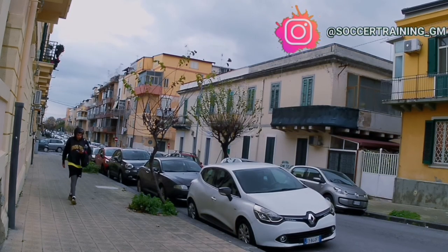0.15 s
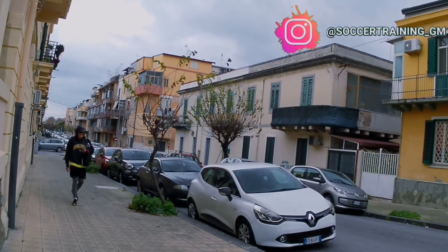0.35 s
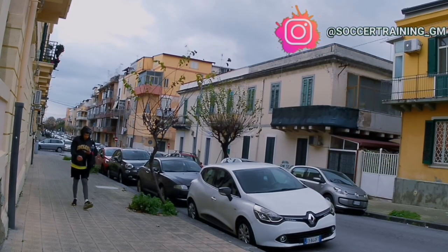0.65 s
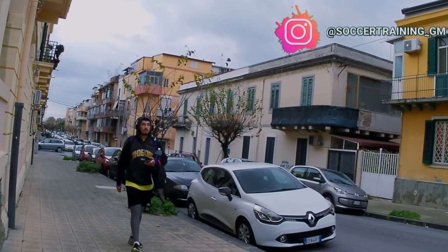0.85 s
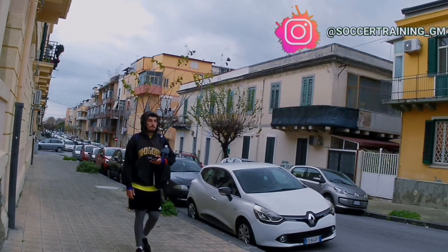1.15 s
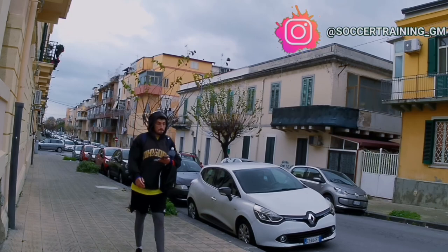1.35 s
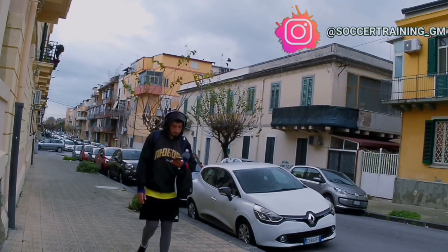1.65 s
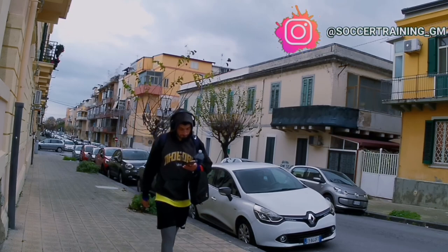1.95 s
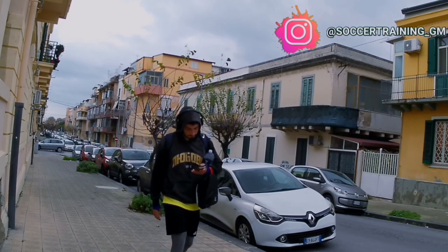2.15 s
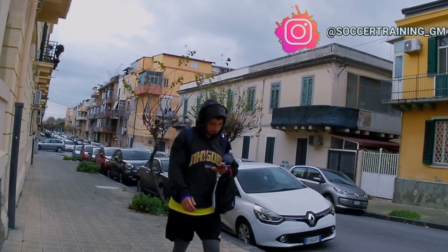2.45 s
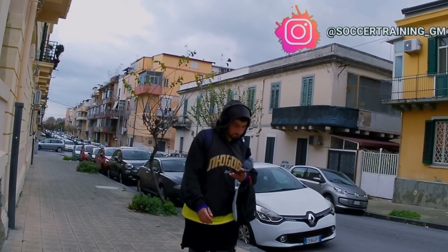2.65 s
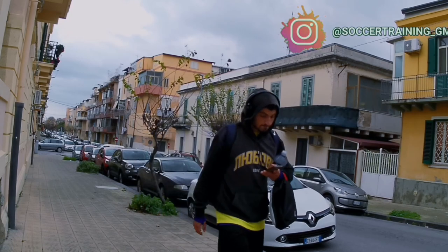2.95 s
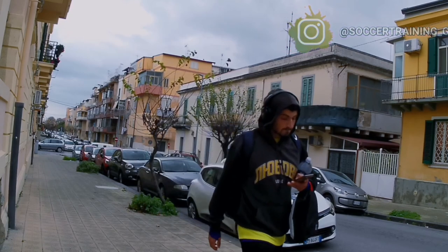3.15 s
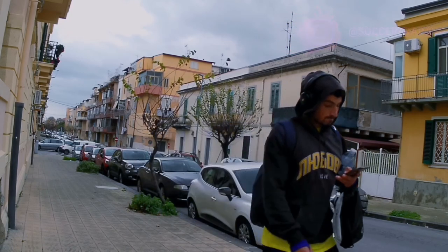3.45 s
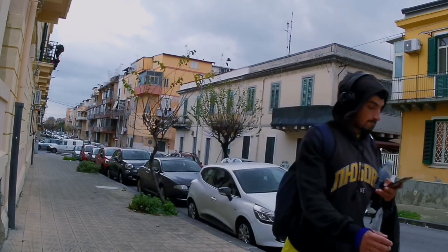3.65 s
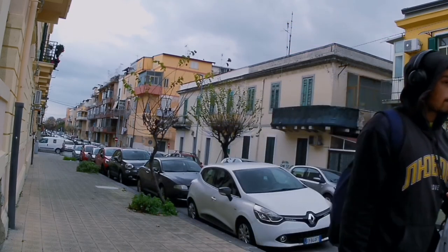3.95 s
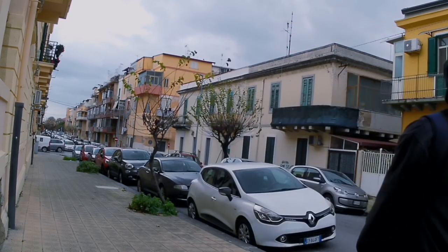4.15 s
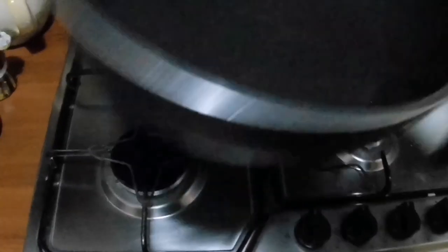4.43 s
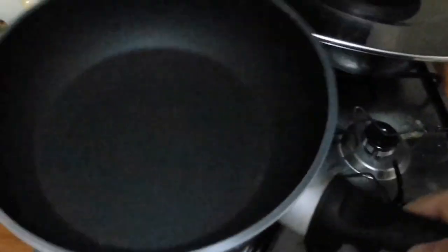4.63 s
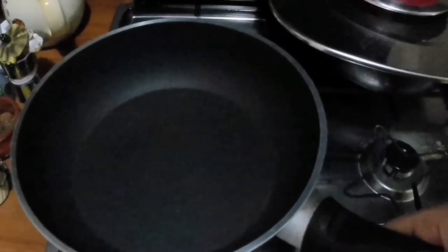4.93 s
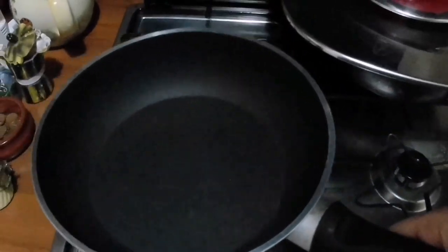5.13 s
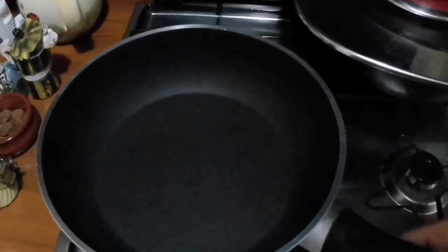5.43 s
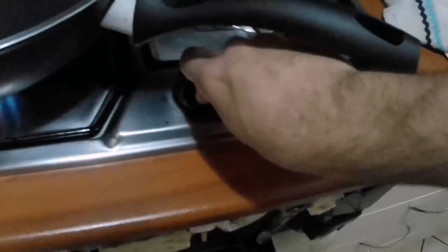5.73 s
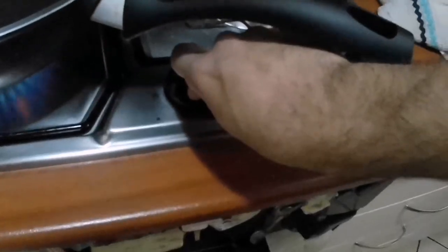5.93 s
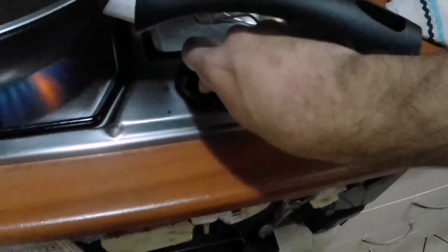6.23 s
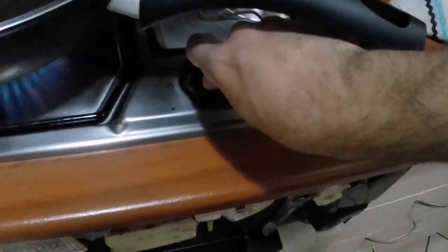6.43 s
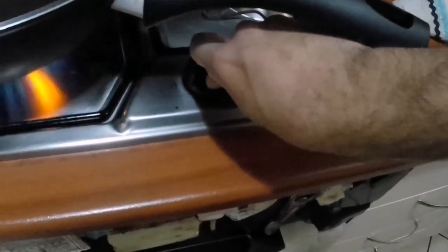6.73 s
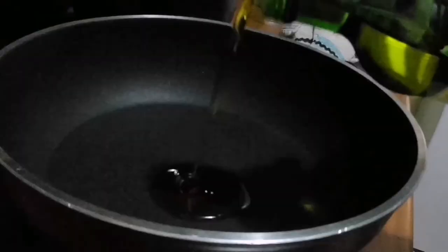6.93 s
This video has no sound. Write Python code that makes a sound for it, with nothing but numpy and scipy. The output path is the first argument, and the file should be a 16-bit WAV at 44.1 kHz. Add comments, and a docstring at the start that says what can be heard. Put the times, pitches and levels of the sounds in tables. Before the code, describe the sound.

Single-channel handheld sound with soft ticks at abrupt cuts. First, muffled road noise and engine drone outdoors, then a quieter street with deep rumble and a slow motor. Next, a nearly silent kitchen with faint whirs, broken by a loud, close pan landing on a gas hob, bouncing and scraping briefly. Finally, evenly spaced crisp spark cracks, a fluttering burner ignition, low flame and gas hiss.

```python
"""Quiet town street, in two passages, then a small kitchen, in three; all joined by quick cuts.
Street: coloured-noise traffic, engines as harmonics of a firing rate, soles scuffing the pavement.
Kitchen: a pan lands on the steel grate of a gas hob (noise blows, ringing modes) and rattles to rest.
The igniter snaps four times (noise cracks that ring the steel); the first spark lights the burner with
a soft whoosh, and the flame hisses on (low roar, gas noise in the burner tube's resonances)."""
import sys
import numpy as np
from scipy import signal
from scipy.fft import rfft, irfft, next_fast_len
from scipy.io import wavfile
from scipy.ndimage import map_coordinates

SR = 44100
rng = np.random.default_rng(int(sys.argv[2]) if len(sys.argv) > 2 else 0)


def pcm_store(signal):
    """Save signal as 16-bit PCM."""
    levels = np.round(np.clip(np.atleast_2d(signal), -1, 1) * 32767)
    wavfile.write(sys.argv[1], SR, levels.astype(np.int16).T)


N = 312448

# Passages: (start [s], end [s], fade-in [s], fade-out [s])
BUSY_SPAN = (-.1, .778, .01, .002)
CALM_SPAN = (.8, 4.286, .01, .001)
PAN_SPAN = (4.351, 5.723, .00005, .00005)
FLAME_SPAN = (5.728, 6.977, .018, .00006)
LAST_SPAN = (6.988, 7.2, .012, .002)
SPANS = (BUSY_SPAN, CALM_SPAN, PAN_SPAN, FLAME_SPAN, LAST_SPAN)

# Noise spectra of street traffic and low rumble: (frequency [Hz], relative density [dB])
BUSY_SPECTRUM = [(25, -4.5), (85, -7), (115, -10.5), (232, -12.5), (390, -20), (900, -20), (1190, -17.5),
                 (1480, -28.5), (2000, -25), (3300, -47), (3950, -49.5), (4700, -41.5), (6000, -59),
                 (11000, -81)]
CALM_SPECTRUM = [(65, -15), (110, -1.5), (178, -9), (198, -4), (371, -11), (611, -8), (1000, -15),
                 (1140, -12.5), (1400, -19), (1810, -16), (2600, -26.5), (3270, -38), (4810, -40),
                 (6340, -50.5), (9000, -67), (11700, -73), (19800, -120)]
RUMBLE_SPECTRUM = [(11, -38), (18, -7), (27, 7), (43, 1), (64, -2), (91, -2.5), (113, -26.5), (130, -12),
                   (170, -64), (290, -120)]
# Noise spectra of flame roar, ignition whoosh and kitchen air: (frequency [Hz], relative density [dB])
ROAR_SPECTRUM = [(30, -14), (80, 1), (135, -6), (175, -14), (260, -7.5), (400, -18.5), (550, -19.5),
                 (900, -25.5), (2500, -76)]
WHOOSH_SPECTRUM = [(130, -39), (220, -3), (312, -33), (348, 10), (453, -4), (582, 5.5), (1110, -1),
                   (1600, -10), (3000, -24.5), (3900, -63), (6600, -120)]
ROOM_SPECTRUM = [(20, -10.5), (45, -15), (80, -24), (170, -41), (270, -34), (400, -39), (650, -42.5),
                 (1000, -44), (1400, -47.5), (1900, -48), (3000, -55.5), (15000, -64.5)]
# Noise spectra of the pan's blow, the hollow hob and the spark: (frequency [Hz], relative density [dB])
CLANK_SPECTRUM = [(300, -21), (850, -9.5), (1250, 8.5), (1750, -6), (2300, 1.5), (3100, -9), (3500, -9.5),
                  (4300, -21), (4900, -4), (5500, -33.5), (6400, -23.5), (8700, -36), (11500, -28),
                  (16000, -37.5)]
HOB_SPECTRUM = [(20, -16), (45, 2.5), (85, -18.5), (125, -4.5), (185, -5), (228, -16.5), (275, -0.5),
                (370, -12), (520, -15), (800, -17), (1500, -19), (4000, -66.5)]
SNAP_SPECTRUM = [(150, -20), (650, -14), (1050, 7), (1300, -5), (1600, -1), (2200, 3), (3200, -12),
                 (4080, -0.5), (4450, -7.5), (5100, 2.5), (5900, -4), (6750, 0.5), (7600, -9.5), (8300, 1),
                 (9700, -7), (10900, 4.5), (11800, -1), (12500, -1.5), (13350, -10), (13750, -5.5),
                 (15000, -6), (16500, -24)]
# Envelope of the steel modes a spark rings: (frequency [Hz], relative level [dB])
SPARK_RING_SPECTRUM = [(1000, 7.5), (3200, -3.5), (4800, 2.5), (8000, -6), (11500, -9), (15000, -18)]

# Resonances of car tyres and a thin high traffic hiss: (frequency [Hz], width [Hz], relative level [dB])
TYRE_PEAKS = [(253.7, 6.2, 5), (625, 3.7, 5), (686, 138, -4.5)]
SQUEAL_PEAKS = [(6500, 93, 0), (6780, 120, 2)]
# Resonances of pavement scuffs: (frequency [Hz], width [Hz], relative level [dB])
SCUFF_PEAKS = [(4600, 380, 6), (6700, 420, -5)]
# Resonances of the burner tube, at first and settled: (frequency [Hz], width [Hz], relative level [dB])
JET_PEAKS = [(1110, 52, -4), (1050, 75, 0), (1350, 130, -10), (1980, 190, -14)]
SETTLED_JET_PEAKS = [(1290, 130, 3.5), (1500, 135, -2), (2050, 200, -14), (2480, 230, 1), (4900, 670, -18)]
# Pan dragging, and its weight on the springy hob: (frequency [Hz], width [Hz], relative level [dB])
GROAN_PEAKS = [(276, 16, 4.5), (399, 50, -9.5), (495, 22, -15), (676, 17, -16), (1147, 50, -14),
               (1515, 230, -22.5), (1940, 33, -15.5), (2126, 25, -20), (2540, 87, -27.5)]
ROCKING_PEAKS = [(48, 15, 1), (121, 6.8, -10)]

# Engine slowing to idle, then picking up a little: (time [s], mean firing rate [Hz])
ENGINE_SPEED = [(.8, 54), (1.13, 49.66), (1.6, 48.27), (2.3, 33.77), (3.4, 35.18), (4.3, 40.94)]
# How hard the engine labours: (time [s], mean level [dB])
ENGINE_LOAD = [(.8, -41), (.88, -31.5), (1.07, -29.5), (1.12, -42), (1.25, -33.5), (1.42, -46),
               (1.9, -39.5), (2.35, -37.5), (2.72, -32), (3.1, -35.5), (3.3, -44), (3.8, -43), (4.2, -40)]
# Far machine's harmonics: (multiple of its rate, mean level [dB])
HUM_ORDERS = [(2, -57.5), (5, -66), (6, -65.5), (7, -73.5), (8, -81)]
# Pavement scuffs and pan drags: (peak [s], rise per 20 dB [s], fall per 20 dB [s], level [dB])
SCUFFS = [(1.36, .1, 0.24, -73.5), (3.35, .02, 0.12, -75), (3.92, .15, .2, -77)]
DRAGS = [(5.35, 0.034, 0.29, -33.5), (5.595, 0.077, 0.06, -37), (5.69, 0.072, 0.069, -38.5)]
# Faint whirs and rustles: (peak [s], rise per 20 dB [s], fall per 20 dB [s], level [dB],
# frequency at peak [Hz], width [Hz], glide [Hz/s])
WHIRS = [(4.43, 0.059, 0.048, -61, 970, 25, -100), (4.6, 0.17, 0.19, -60.5, 987, 45, 1),
         (4.86, 0.12, 0.23, -66, 970, 42, 150), (4.87, .1, 0.22, -74.5, 1950, 280, 3),
         (4.99, 0.05, 0.1, -71.5, 1830, 70, -1), (5.09, .06, 0.15, -71, 1880, 71, -600),
         (5.145, .05, 0.11, -73.5, 1400, 50, -1300)]
# Flame catches, runs round the ring, closes it: (peak [s], rise per 20 dB [s], fall per 20 dB [s],
# whoosh level [dB], roar level [dB])
PUFFS = [(5.783, 0.0058, 0.066, -42, -42.5), (5.838, 0.066, 0.13, -70, -39.5),
         (5.893, 0.003, 0.037, -46, -46), (5.916, 0.0069, 0.032, -44, -47), (5.931, .005, 0.023, -44, -37),
         (5.948, .005, 0.023, -42, -39), (5.956, 0.003, 0.05, -43.5, -42)]
# Igniter: (time [s], spark gain [dB], most resonant pitch of the crack [Hz], tilt [dB/octave])
SPARKS = [(5.7767, -25.5, 2080, 1.5), (6.1359, -29.5, 8350, 0), (6.4792, -29.5, 12450, 0.2),
          (6.837, -29, 10800, 0.5)]
# Pan strikes on the grate: (time [s], thud [dB], grate ring [dB], pan ring [dB], rim clink [dB], sheen [dB])
CONTACTS = [(5.3193, -15.5, -11.5, -1, -8, -11.5), (5.3292, -18.5, -11, -20, -5, -7.5),
            (5.336, -26, -25, -13, -17, -12), (5.35, -18, -12, -15, -8, -6),
            (5.365, -25, -23, -16, -28, -19), (5.377, -22.5, -20, -26, -28, -32.5),
            (5.396, -25.5, -13, -14, -11.5, -7.5), (5.402, -26.5, -28, -20, -15.5, -15),
            (5.412, -29, -22, -16.5, -13, -6.5), (5.422, -25, -24, -23, -25, -22),
            (5.436, -28.5, -21, -16.5, -19, -17.5), (5.446, -32.5, -20, -21, -20, -29.5),
            (5.4557, -28, -15, -15, -30, -33), (5.496, -46, -28, -37, -29, -29.5),
            (5.509, -47, -20.5, -26, -29, -32), (5.517, -39, -28, -31, -33, -28),
            (5.5426, -31, -17, -23.5, -16, -23), (5.552, -45, -29, -34, -39, -30),
            (5.57, -31, -26, -43, -42, -41), (5.579, -34.5, -37, -47, -57, -55),
            (5.683, -40, -48, -48, -52, -63)]
# Pan-and-grate modes: (frequency [Hz], mean relative level [dB], undamped T60 [s])
STEEL_MODES = [(275, -4, 0.6), (415, -9.5, 0.48), (592, -11, 0.46), (686.5, -6.5, 0.9), (848, -19.5, 0.42),
               (1066, -14, 0.56), (1135, -8, .25), (1233, -7.5, 0.32), (1248, -9.5, 0.29), (1435, -9, 0.23),
               (1452, -7.5, 0.25), (1577, -9, 0.2), (1626, -14, 0.24), (1879, -15, 0.5), (2060, -17.5, .4),
               (2084, -13.5, 0.33), (2140, -11, 0.35), (2194, -6.5, 0.45), (2244, -3.5, 0.2),
               (2450, -16, 0.17), (2651, -10, 0.43), (2830, -16, 0.27), (3375, -17.5, 0.3),
               (3680, -18, 0.2), (4030, -22.5, 0.22), (4700, -12.5, .22), (4850, -11, 0.2),
               (4910, -19.5, 0.22), (5140, -22, .35), (5910, -20.5, 0.3), (6270, -25, 0.363),
               (6340, -24, 0.35), (7350, -30.5, 0.36), (7784, -30.5, .4), (8000, -28, 0.24),
               (8340, -27.5, 0.35), (9240, -25, 0.25), (9330, -22.5, .2), (10790, -15.5, 0.2),
               (11100, -24, 0.16), (11340, -22, 0.62), (12000, -27.5, .25), (13230, -35.5, .45),
               (13950, -33, .35), (14720, -35, .4), (15100, -39.5, 0.4)]
# Kitchen reverberation: (frequency [Hz], T60 [s])
KITCHEN_T60 = [(100, 0.2), (1000, 0.094), (5000, 0.43), (10000, 0.3), (14000, 0.46)]

# Street
BUSY_DB, RECEDE_DB_PER_S = -31, 7.5
TRAFFIC_DB, RUMBLE_DB = -50.5, -37.5
NEAR_S, NEAR_DB_PER_S = 2.77, 3.5  # a distant car's wash grows from NEAR_S on
TYRE_DB, TYRES_FULL_S, TYRE_DB_PER_S = -48.5, 2.984, 26
HUM_HZ = 88.4
# Burner
FLAME_DB, FLAME_GROWS_S, FLAME_GROWS_DB_PER_S = -56, 6.48, 9.5
JET_DB, JET_WHISTLE_DB = -60.5, -62
JET_WHISTLE_HZ, JET_WHISTLE_WIDTH_HZ, JET_GLIDE_HZ_PER_S = 1495, 125, -200  # pitch at FLAME_GROWS_S
THUMP_HZ, THUMP_T60_S, THUMP_OVER_ROAR_DB = 109, .08, 6
# Igniter
CRACK_DB, CRACK_T60_S = 8.5, 0.0055
SCATTER_DB, SCATTER_T60_S = -4.5, 0.077
ALIKE_POWER_SHARE = 0.82  # part of crack and scatter that repeats from spark to spark
EDGE_DB, EDGE_WIDTH_HZ = 9, 300
SPARK_RING_DB, SPARK_RING_T60_S = -21.5, 0.29
# Pan
ROCK_DB, ROCK_RISE_S, ROCK_FALL_S = -29.5, 0.034, 1.6
RATTLE_DB, RATTLE_FALL_S, RATTLE_PER_S = -28.5, 0.061, 590
CROWD_SPACING_HZ, CROWD_DB, CROWD_T60_S = 55.3, -19, 0.12  # weak modes of thin steel
CROWD_LOWEST_HZ = 800
CHOKE_DB_PER_S2 = 679.5  # ringing is choked ever faster as the grate takes the weight
BEND_SHARE, BEND_S = .011, .025  # each contact bends the modes off pitch
CONTACT_LOSS_DB_AT_5KHZ = 7
# Recorder
TOP_HZ = 15800


def amp(db):
    """Decibels to gain."""
    return 10 ** (np.asarray(db) / 20)


def unit(x):
    """Scaled to rms 1."""
    return x / np.sqrt(np.mean(x ** 2) + 1e-20)


def clock():
    """Time of every sample, s."""
    return np.arange(N) / SR


def along(points, hz):
    """(frequency, value) points interpolated on a log-frequency axis."""
    point_hz, values = np.transpose(points)
    return np.interp(np.log(hz + 1), np.log(point_hz + 1), values)


def curve(rows):
    """(time, value) rows interpolated to every sample."""
    times_s, values = np.transpose(rows)
    return np.interp(clock(), times_s, values)


def wobble(knots_per_s):
    """Smooth random curve."""
    knots = rng.standard_normal(int(N * knots_per_s / SR) + 4)
    return map_coordinates(knots, [np.arange(N) * knots_per_s / SR])


def swells(rows):
    """Summed gain of (peak s, rise s, fall s, dB) swells; rise and fall are the times for 20 dB."""
    t = clock()
    return sum(amp(db - 20 * np.maximum((peak_s - t) / rise_s, (t - peak_s) / fall_s))
               for peak_s, rise_s, fall_s, db in rows)


def passage(span):
    """Gain 1 during a passage, 0 outside, with linear fades."""
    start_s, end_s, fade_in_s, fade_out_s = span
    t = clock()
    return np.clip(np.minimum((t - start_s) / fade_in_s, (end_s - t) / fade_out_s), 0, 1)


def add(track, time_s, sound):
    """Mix a sound into the track at time_s."""
    part = track[round(time_s * SR):][:len(sound)]
    part += sound[:len(part)]


def filtered(x, response):
    """x through a frequency response."""
    size = next_fast_len(len(x) + SR // 4)
    spectrum = rfft(x, size) * response(np.fft.rfftfreq(size, 1 / SR))
    return irfft(spectrum, size)[:len(x)]


def noise(spectrum, size=N):
    """Coloured noise of rms 1."""
    return unit(filtered(rng.standard_normal(size), lambda hz: amp(along(spectrum, hz))))


def gritty(spectrum, size, bursts_per_s):
    """Rough coloured noise of rms 1: tiny irregular bursts over a steady floor."""
    hits = (rng.random(size) < bursts_per_s / SR) * rng.exponential(1, size)
    envelope = signal.lfilter([1], [1, -np.exp(-1 / (0.0016 * SR))], hits) + 0.49
    return unit(filtered(envelope * rng.standard_normal(size), lambda hz: amp(along(spectrum, hz))))


def resonant(peaks):
    """Noise of rms 1 in summed resonances."""
    def response(hz):
        return sum(amp(db) / (1 + ((hz - peak_hz) / width_hz) ** 2) for peak_hz, width_hz, db in peaks)
    return unit(filtered(rng.standard_normal(N), response))


def gliding(hz, width_hz, glide_hz_per_s, time_s):
    """Narrow noise of rms near 1, passing through hz at time_s."""
    band = signal.hilbert(resonant([(hz, width_hz, 0)]), next_fast_len(N))[:N]
    return np.real(band * np.exp(1j * np.pi * glide_hz_per_s * (clock() - time_s) ** 2))


def tone(hz):
    """Sine of rms 1 on a pitch curve, random phase."""
    return np.sqrt(2) * np.sin(2 * np.pi * (np.cumsum(hz) / SR + rng.random()))


def crowd(spectrum, size, spacing_hz):
    """Many weak undamped steel modes at rms 1; a circular shift gives the same modes in new phases."""
    hz = np.fft.rfftfreq(size, 1 / SR)
    chance, phase = rng.random((2, len(hz)))
    present = (chance < hz[1] / spacing_hz) * (hz > CROWD_LOWEST_HZ)
    strength = present * rng.rayleigh(1, len(hz)) * amp(along(spectrum, hz))
    return unit(irfft(strength * np.exp(2j * np.pi * phase), size))


def room(x):
    """Kitchen reverberation: each frequency of a noise tail dies at its own speed."""
    hz, t, bins = signal.stft(rng.standard_normal(SR // 2), SR, nperseg=256)
    decay = amp(-60 * t / along(KITCHEN_T60, hz)[:, None])
    tail = signal.istft(bins * decay, SR, nperseg=256)[1]
    delayed = np.pad(tail, (SR // 300, 0))
    return signal.fftconvolve(x, delayed / np.linalg.norm(tail))[:len(x)]


def background():
    """Kitchen air noise, an appliance's hum while the pan lands, faint hiss throughout."""
    indoors = passage(PAN_SPAN) + passage(FLAME_SPAN) + passage(LAST_SPAN)
    air = amp(-54.0 + 0.92 * wobble(3.0)) * noise(ROOM_SPECTRUM)
    hum = amp(-70.5) * tone(436 * (1 + .002 * wobble(7)))
    hiss = amp(-72.5) * noise([(100, 18.5), (5000, -5.0), (15000, -3.5)])
    return air * indoors + hum * passage(PAN_SPAN) + hiss


def busy_street():
    """Receding traffic wash, thin high hiss, and one engine's firing rate with its third harmonic."""
    wash = amp(BUSY_DB - RECEDE_DB_PER_S * clock() + 0.39 * wobble(12.2)) * noise(BUSY_SPECTRUM)
    squeal = amp(-75.0 + 3.5 * wobble(11)) * resonant(SQUEAL_PEAKS)
    firing_hz = 83.5 * (1 + 0.0013 * wobble(9.1))
    harmonics = tone(firing_hz) + amp(-13.0) * tone(3 * firing_hz)
    drone = amp(-35.0 + 0.31 * wobble(7.8)) * harmonics
    return (wash + squeal + drone) * passage(BUSY_SPAN)


def calm_street():
    """Far traffic noise, a slowing engine's harmonics, machine hum, and swelling tyre resonances."""
    t = clock()
    near_db = NEAR_DB_PER_S * np.maximum(t - NEAR_S, 0)
    wash = amp(TRAFFIC_DB + near_db + .5 * wobble(8)) * noise(CALM_SPECTRUM)
    rumble = amp(RUMBLE_DB + 0.63 * wobble(7.1)) * noise(RUMBLE_SPECTRUM)
    tyres = amp(TYRE_DB - TYRE_DB_PER_S * np.maximum(TYRES_FULL_S - t, 0)) * resonant(TYRE_PEAKS)
    firing_hz = curve(ENGINE_SPEED) * (1 + 0.0096 * wobble(12.0))
    load = amp(curve(ENGINE_LOAD) + 1.6 * wobble(18))
    engine = load * (tone(firing_hz) + amp(-24.0) * tone(2 * firing_hz))
    hum_hz = HUM_HZ * (1 + .003 * wobble(5))
    hum = sum(amp(db + 3.5 * wobble(3.01)) * tone(order * hum_hz) for order, db in HUM_ORDERS)
    return (wash + rumble + tyres + engine + hum) * passage(CALM_SPAN)


def walker():
    """Soles scuff the pavement: swells of resonant high noise."""
    return swells(SCUFFS) * resonant(SCUFF_PEAKS) * passage(CALM_SPAN)


def whirs():
    """Faint, wavering narrow-band noises that glide a little in the quiet kitchen."""
    out = np.zeros(N)
    for peak_s, rise_s, fall_s, db, hz, width_hz, glide_hz_per_s in WHIRS:
        out += swells([(peak_s, rise_s, fall_s, db)]) * gliding(hz, width_hz, glide_hz_per_s, peak_s)
    return out * passage(PAN_SPAN)


def thumps():
    """Each puff pushes the air under the pan: a short decaying low sine."""
    out, t = np.zeros(N), np.arange(SR // 5) / SR
    envelope = amp(THUMP_OVER_ROAR_DB - 60 * t / THUMP_T60_S) * (1 - np.exp(-t / .002))
    push = np.sin(2 * np.pi * THUMP_HZ * t) * envelope
    for peak_s, *_, roar_db in PUFFS:
        add(out, peak_s, amp(roar_db) * push)
    return out


def burner():
    """Gas hisses in tube resonances, catches in sputtering puffs, burns with a low flutter."""
    t = clock()
    lit = t > SPARKS[0][0]
    steady = amp(FLAME_DB + FLAME_GROWS_DB_PER_S * np.maximum(t - FLAME_GROWS_S, 0))
    flame = lit * (steady + swells([(s, rise, fall, roar_db) for s, rise, fall, _, roar_db in PUFFS]))
    flare = lit * swells([(s, rise, fall, whoosh_db) for s, rise, fall, whoosh_db, _ in PUFFS])
    roar = flame * amp(1.01 * wobble(9.1)) * noise(ROAR_SPECTRUM)
    throb_hz = 131 * (1 + 0.023 * wobble(23))  # air under the pan resonates
    throb = flame * amp(-2.5 + 0.9 * wobble(5.5)) * tone(throb_hz)
    whoosh = flare * gritty(WHOOSH_SPECTRUM, N, bursts_per_s=1300)
    hiss = (amp(JET_DB) + amp(-27) * flare) * resonant(JET_PEAKS)
    # upper tube resonance sinks steadily
    whistle = gliding(JET_WHISTLE_HZ, JET_WHISTLE_WIDTH_HZ, JET_GLIDE_HZ_PER_S, FLAME_GROWS_S)
    hiss += amp(JET_WHISTLE_DB) * whistle
    settled = amp(-60.5) * resonant(SETTLED_JET_PEAKS)
    catching = roar + throb + thumps() + whoosh + hiss
    return catching * passage(FLAME_SPAN) + settled * passage(LAST_SPAN)


def igniter():
    """Millisecond noise cracks, scattered along much the same paths, faintly ring steel and kitchen."""
    size = SR // 2
    out, t = np.zeros(N), np.arange(size) / SR
    paths = noise(SNAP_SPECTRUM, size)
    weak_modes = crowd(SPARK_RING_SPECTRUM, size, spacing_hz=110)
    onset = 1 - np.exp(-t / 0.00049)
    for time_s, db, edge_hz, tilt_db in SPARKS:
        fresh = noise(SNAP_SPECTRUM, size)
        burst = np.sqrt(ALIKE_POWER_SHARE) * paths + np.sqrt(1 - ALIKE_POWER_SHARE) * fresh
        burst = filtered(burst, lambda hz: amp(tilt_db * np.log2((hz + 1) / 4000))) * onset
        crack = burst * amp(CRACK_DB - 60 * t / CRACK_T60_S)
        scatter = burst * amp(SCATTER_DB - 60 * t / SCATTER_T60_S)
        edge = filtered(crack, lambda hz: amp(EDGE_DB) / (1 + 1j * (hz - edge_hz) / EDGE_WIDTH_HZ))
        steel = np.roll(weak_modes, rng.integers(size)) * amp(SPARK_RING_DB - 60 * t / SPARK_RING_T60_S)
        reverb = amp(-16.5) * room(crack + scatter)
        add(out, time_s, amp(db) * (crack + edge + scatter + steel + reverb))
    return out


def ring(size, split, damping_db_per_s):
    """Steel modes as beating pairs of random strength, bent by the contact and springing back."""
    hz, db, t60_s = np.transpose(STEEL_MODES)[:, :, None]
    t, out = np.arange(size) / SR, np.zeros(size)
    released = 1 - np.exp(-t / BEND_S)
    drained_db = CONTACT_LOSS_DB_AT_5KHZ * np.sqrt(hz / 5000) * released  # contact drains high modes most
    decay = amp(db - drained_db - (60 / t60_s + damping_db_per_s) * t)
    for partner in range(2):
        detune, strength, phase, bend = rng.standard_normal((4, len(hz), 1))
        bent_s = bend * BEND_SHARE * BEND_S * released  # integral of the fading bend
        cycles = hz * ((1 + split * detune) * t + bent_s) + phase
        out += np.sum(amp(3 * strength) * decay * np.sin(2 * np.pi * cycles), axis=0)
    return out


def strike(time_s, thud_db, grate_db, pan_db, rim_db, sheen_db, weak_modes):
    """One contact: noise clank and chatter, ringing steel, and a thump of the hollow hob."""
    size = len(weak_modes)
    t = np.arange(size) / SR
    blow = amp(3.5 - 60 * t / 0.022) * noise(CLANK_SPECTRUM, size)
    chatter = amp(-10.0 - 60 * t / 0.084) * gritty(CLANK_SPECTRUM, size, bursts_per_s=610)
    damping = CHOKE_DB_PER_S2 * (time_s - CONTACTS[0][0] + t / 2)
    shimmer = np.roll(weak_modes, rng.integers(size)) * amp(CROWD_DB - (60 / CROWD_T60_S + damping) * t)
    metal = amp(-11.0) * ring(size, split=.0035, damping_db_per_s=damping) + shimmer + blow + chatter
    # weight of the blow drives low modes, hardness the high ones
    force = [(650, thud_db + 5.5), (1150, grate_db), (1550, grate_db),
             (2200, pan_db), (4800, rim_db), (10000, sheen_db)]
    metal = filtered(metal, lambda hz: amp(along(force, hz))) * (1 - np.exp(-t / 0.0011))
    thud = noise(HOB_SPECTRUM, size) * amp(thud_db - 60 * t / 0.2) * (1 - np.exp(-t / 0.0034))
    return metal + thud


def pan():
    """Pan strikes and rebounds, rattles, drags on the grate and rocks to rest, with kitchen reverb."""
    out = np.zeros(N)
    weak_modes = crowd(CLANK_SPECTRUM, SR * 3 // 10, CROWD_SPACING_HZ)
    for contact in CONTACTS:
        add(out, contact[0], strike(*contact, weak_modes))
    landed_s = CONTACTS[0][0]
    fullest_s = landed_s + ROCK_RISE_S
    rocking = swells([(fullest_s, ROCK_RISE_S, ROCK_FALL_S, ROCK_DB)]) * resonant(ROCKING_PEAKS)
    rattle_gain = swells([(fullest_s, ROCK_RISE_S, RATTLE_FALL_S, RATTLE_DB)])
    rattle = rattle_gain * gritty(CLANK_SPECTRUM, N, RATTLE_PER_S)
    drag = swells(DRAGS) * resonant(GROAN_PEAKS)
    out += (drag + rocking + rattle) * (clock() > landed_s)
    return (out + amp(-11.5) * room(out)) * passage(PAN_SPAN)


def scene():
    """Street first, then the kitchen, over faint hiss; one channel."""
    street = busy_street() + calm_street() + walker()
    kitchen = whirs() + burner() + igniter() + pan()
    return (background() + street + kitchen)[None]


def record(dry):
    """Recorder: rounded peaks, an offset in each passage so cuts tick softly, and a band limit."""
    offset = .014 * sum(passage(span) for span in SPANS)
    rounded = dry[0] / (1 + dry[0] ** 6) ** (1 / 6)
    return filtered(rounded + offset, lambda hz: hz < TOP_HZ)[None]


dry = scene()
out = record(dry)
pcm_store(out)
```